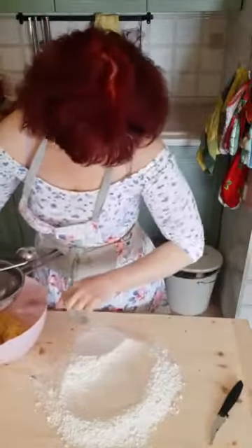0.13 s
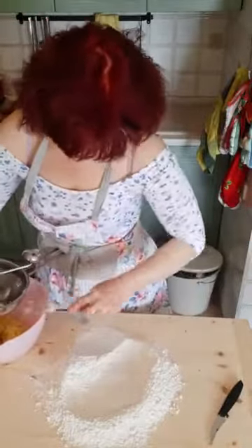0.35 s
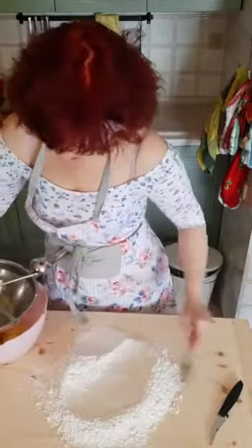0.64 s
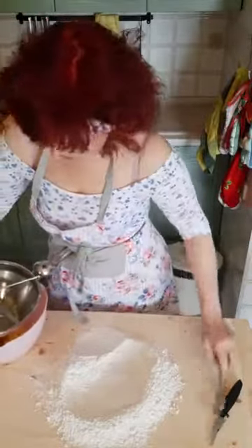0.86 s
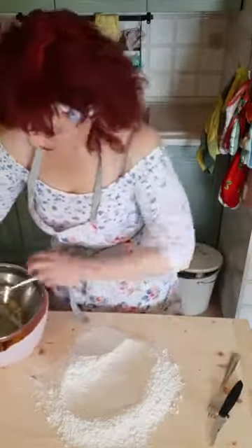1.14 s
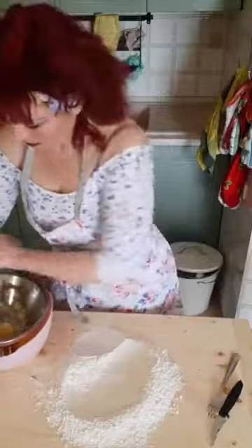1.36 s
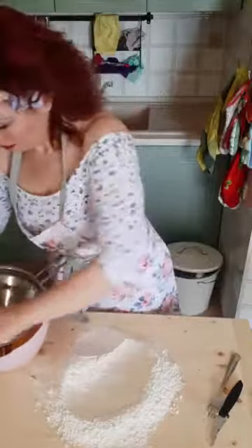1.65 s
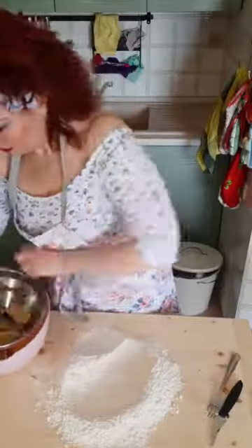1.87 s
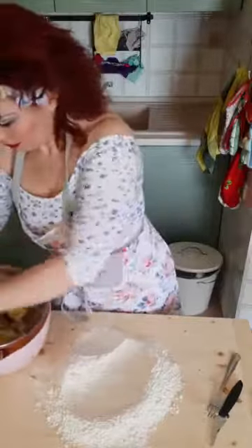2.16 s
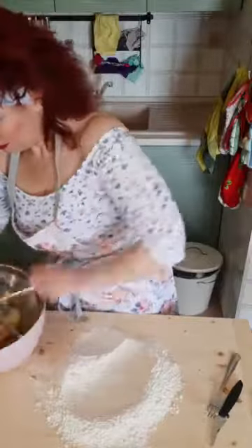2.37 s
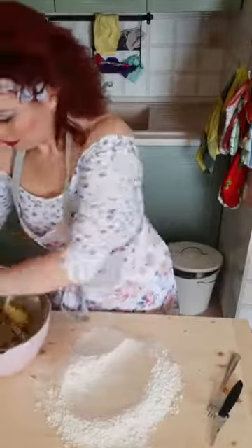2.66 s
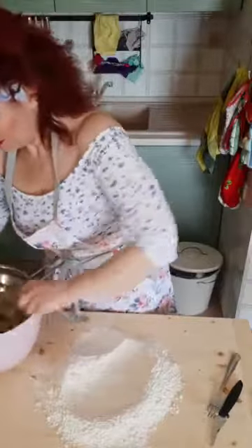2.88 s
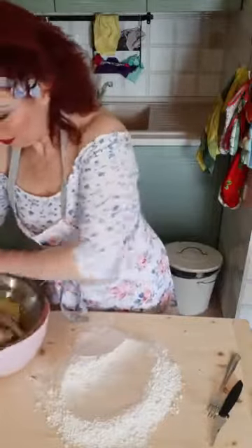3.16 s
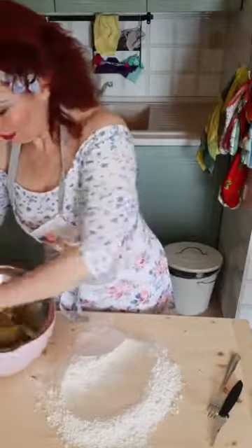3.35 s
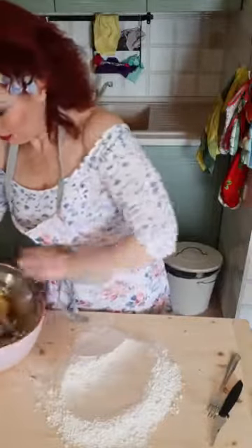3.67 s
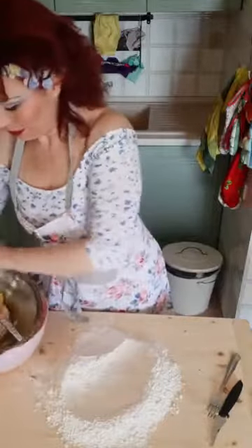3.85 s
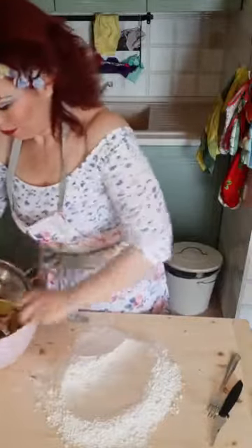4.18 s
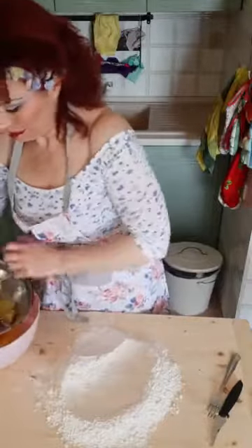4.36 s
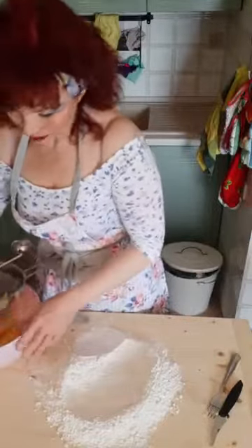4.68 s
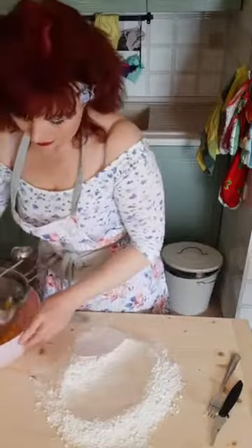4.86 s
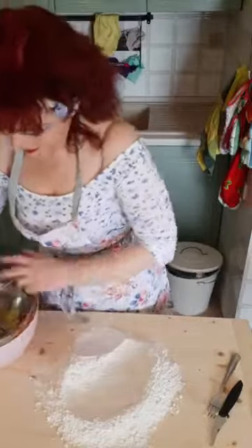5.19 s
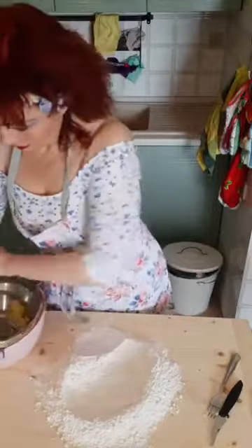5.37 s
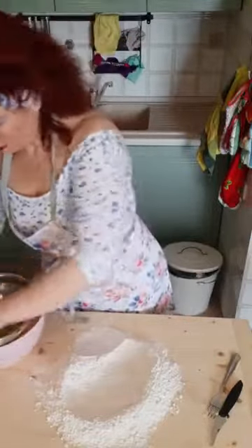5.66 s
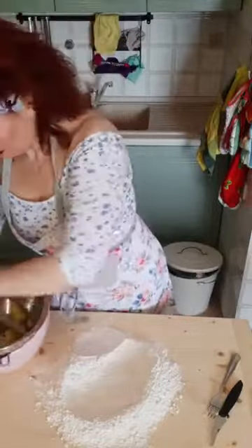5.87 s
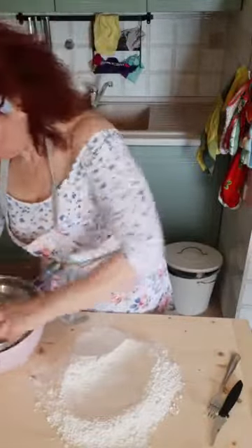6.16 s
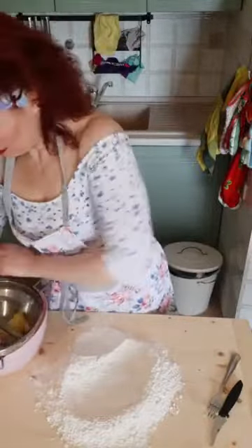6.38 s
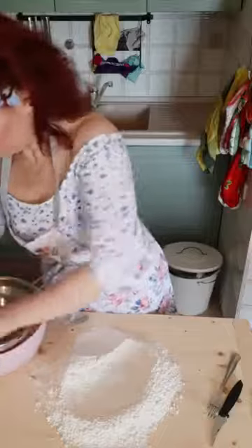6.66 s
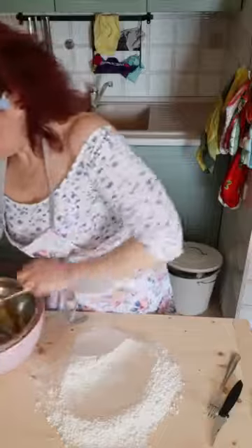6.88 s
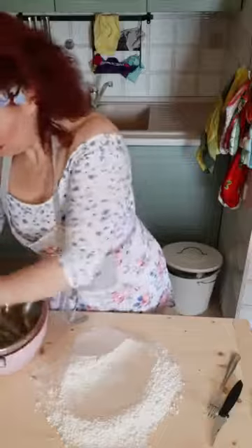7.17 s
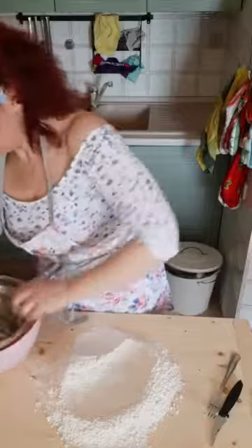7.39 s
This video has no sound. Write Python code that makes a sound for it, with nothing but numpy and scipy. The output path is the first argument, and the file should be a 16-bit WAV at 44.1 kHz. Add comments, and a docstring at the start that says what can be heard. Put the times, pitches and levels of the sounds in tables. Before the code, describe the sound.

A nearby stereo microphone hears a tiled kitchen with a lively half-second echo, faint hush and low table rumble. At 0.0, 0.15 and 0.3 seconds a fork taps a bowl, bright and ringing, the third strongest. A faint touch comes at 0.5; from 0.8 to 1.05 the fork clatters onto a wooden board, ending in the firmest contact. A clear bowl knock at 1.27 introduces a steel hand mill. From about 1.65 to 4.2 it grinds potato in uneven strokes, with gritty rasping, stick-slip clicks, ticks and small metal rattles, swelling around 2.2 and 4.0, with a solid knock at 3.6. A loud clank rings at 4.25, followed by brief scrapes and a lull. A heavier, blurred clank lands at 5.05. Grinding restarts near 5.3, growing fuller from 6.0 to 7.5, brighter and scrapier, with scattered knocks, the last at 7.5.

```python
"""A fork is tapped clean on a bowl and laid on a board; then a steel hand mill on the bowl is cranked,
its blade grinding potato over the perforated disc, with knocks and ticks, in a tiled kitchen.
Blows set sums of dying sine waves ringing; the crank rings bowl and steel with random stick-slip clicks
and adds gritty noise. Echoes, a low rumble in the table and a faint hush surround them."""
import sys
import numpy as np
from scipy import signal
from scipy.fft import rfft, irfft
from scipy.io import wavfile
from scipy.ndimage import uniform_filter1d

SR = 44100
rng = np.random.default_rng(int(sys.argv[2]) if len(sys.argv) > 2 else 0)


def wrap_up_sound(samples):
    """Save the sound to the file named by the first command line argument, as 16-bit audio."""
    columns = np.atleast_2d(samples).T
    # keep every value between -1 and 1, then stretch to whole-number steps
    tamed = np.clip(columns, -1, 1)
    steps = np.round(tamed * 32767).astype(np.int16)
    wavfile.write(sys.argv[1], SR, steps)


N = 332060

# How the bowl rings. Each row: pitch in Hz, width in Hz (wider dies sooner), relative level in dB.
BOWL_MODES = [(180, 110, -20), (286, 28, -7), (370, 27.6, -6.5), (437.5, 34.3, -4), (469.4, 13.7, -3.5),
              (508.4, 22.8, -1), (560, 107, -4.5), (623.4, 18.7, -8), (701, 42, -11), (718, 69, -10),
              (794, 19, -17), (821, 61, -14.5)]
# How the steel mill rings. Each row: pitch in Hz, width in Hz, relative level in dB.
STEEL_MODES = [(960, 64, 0), (1030, 160, 2), (1275, 950, -7), (1500, 91, -3.5), (1395, 220, -1.5),
               (1517, 104, -5), (1763, 320, -12.5), (1706, 41, -14.5), (2040, 190, 5.5), (2013, 193, 2.5),
               (2374, 240, -1.5), (2467, 190, 3), (2583, 200, 0.5), (2820, 170, -4), (3262, 160, -6),
               (3384, 260, -18.5), (3830, 1050, -0.5), (3810, 480, -16.5)]


def amp(db):
    """Turns decibels into a plain gain."""
    return 10 ** (np.asarray(db) / 20)


def evened(x):
    """Scales a signal to an rms of 1."""
    return x / np.sqrt(np.mean(x ** 2) + 1e-20)


def read(points, hz):
    """Reads a curve between its points, along a logarithmic pitch scale."""
    f, value = np.transpose(points)
    return np.interp(np.log(hz + 1), np.log(f + 1), value)


def add(mix, s, sound):
    """Adds a sound to the mix from second s on, cut off at the mix's end."""
    part = mix[round(s * SR):][:len(sound)]
    part += sound[:len(part)]


def colour(x, points):
    """Filters x by a spectrum given in dB, at unit mean power gain."""
    gain = amp(read(points, np.fft.rfftfreq(x.shape[-1], 1 / SR)))
    return irfft(rfft(x) * evened(gain), x.shape[-1])


def ring(modes, spot_hz, focus_db, held=0):
    """One blow's ringing, energy 1: uneven modes, weaker by focus_db per octave from the spot's pitch."""
    hz, width, db = np.transpose(modes)[:, :, None]
    t = np.arange(16000) / SR
    chance, detune = rng.standard_normal((2, len(modes), 1))
    db = db + 1.5 * chance - focus_db * abs(np.log2(hz / spot_hz))
    hz = hz * (1 + .004 * detune)
    width = width + held  # a hand on the body damps every mode
    sign = (-1) ** np.arange(len(modes))[:, None]  # neighbouring modes move in opposition
    strength = sign * amp(db) * np.sqrt(width)
    x = (strength * np.exp(-np.pi * width * t) * np.sin(2 * np.pi * hz * t)).sum(0)
    return x / np.linalg.norm(x)


def slips(per_s, spread_db):
    """Random stick-slip clicks of uneven size, rms 1."""
    when, size, sign = rng.random((3, N))
    size = np.maximum(size, .04)  # limits the biggest clicks
    clicks = (when < per_s / SR) * amp(-spread_db * np.log(size)) * np.sign(sign - .5)
    return evened(clicks)


def crank():
    """The blade slips over the holes: each slip rings bowl and steel, over a gritty rasp."""
    # Pushes on the crank. Each row: start in seconds, rise in seconds, hold in seconds, fall in seconds,
    # relative load on the bowl in dB, blade on disc in dB above the load, rasp in dB above the load,
    # steel pitch under the blade in Hz.
    strokes = [(1.32, .08, 0.46, .05, -63.5, -8, 1.5, 1900),
               (1.655, 0.019, 0.085, 0.16, -42, -2, -10.5, 1930),
               (1.85, 0.028, 0.022, 0.2, -43.5, -4, -10.5, 1850),
               (2.119, 0.16, 0.055, 0.33, -32.5, -5, -8.5, 1820), (2.609, 0.12, .2, 0.23, -36, 5, -6, 1800),
               (3.15, 0.035, 0.35, .07, -44, -14, -2, 1900),
               (3.61, 0.03, 0.15, 0.25, -44.5, -11, -0.5, 1835), (3.929, .22, .07, .05, -28, 5, -2, 1900),
               (4.35, 0.045, 0.031, 0.14, -37, 1, -21, 1750),
               (4.43, 0.03, 0.012, 0.026, -29, -0.5, -22, 1800),
               (5.29, 0.046, 0.011, 0.064, -42, 3.5, -16, 1300),
               (5.419, 0.097, 0.14, 0.024, -35, -9, -2, 2400),
               (5.54, 0.056, 0.091, 0.092, -31.5, -10, -25, 1800),
               (5.97, 0.015, 0.032, 0.024, -37.5, -10, -25, 1800),
               (6.03, 0.017, 0.12, 0.66, -36.5, 1.5, -8.5, 2160),
               (6.402, 0.24, 0.062, 0.75, -30.5, 2.5, -7.5, 2240),
               (7.09, 0.08, 0.13, 0.32, -36, -6, 1, 2350), (7.239, 0.022, 0.065, 0.2, -29, -6, -10.5, 2400)]
    # Noise of the rasping contact. Each row: pitch in Hz, relative level in dB per Hz.
    rasp_colour = [(410, -43), (700, 1.5), (830, -3.5), (1230, -11), (2020, -7.5), (3150, -7),
                   (4090, -15.5), (7650, -21), (9550, -27), (13800, -23), (15900, -30.5)]
    rows = np.array(strokes)
    pushes = np.array([push(*row[:4]) for row in rows])
    load_db, blade_db, rasp_db, under_hz = rows[:, 4:].T
    spots_hz = np.array([1330, 1800, 2640, 3380])
    # each push favours its own spot
    share = amp(-8 * abs(np.log2(under_hz / spots_hz[:, None])))
    share /= np.linalg.norm(share, axis=0)
    load = amp(load_db) @ pushes
    out = np.zeros(N)
    for spot_hz, here in zip(spots_hz, share):
        blade = (here * amp(load_db + blade_db)) @ pushes
        bowl_ring = ring(BOWL_MODES, 360, 1.9, held=15.5)
        out += 0.36 * signal.oaconvolve(load * slips(70, 3.8), bowl_ring)[:N]
        steel_ring = ring(STEEL_MODES, spot_hz, 6.5, held=15)
        out += .5 * signal.oaconvolve(blade * slips(per_s=70, spread_db=4.5), steel_ring)[:N]
    grains = uniform_filter1d(abs(slips(90, 3.2)), size=90)  # crumbs of about two milliseconds
    catches = uniform_filter1d(abs(slips(22, 2.7)), size=450)  # lumps dragged for ten milliseconds
    roughness = 0.25 + 0.41 * evened(grains) + 0.43 * evened(catches)
    grit = roughness * rng.standard_normal(N)
    rasp = amp(load_db + rasp_db) @ pushes * grit
    return out + amp(4.0) * colour(rasp, rasp_colour)


def push(start, rise, hold, fall):
    """One push's gain: the blade bites, the load swells, holds, eases, and the blade lets go."""
    touch_db, lift_db = -17, -18.5  # below full load at the push's start and end
    bite_db_per_s, let_go_db_per_s = 900, -400  # slopes before the start and after the end
    s = start + np.cumsum([0, rise, hold, fall])
    t = np.arange(0, N, 20) / SR  # one gain for every 20 samples
    db = np.interp(t, s, [touch_db, 0, 0, lift_db])
    db += bite_db_per_s * np.minimum(t - start, 0)
    db += let_go_db_per_s * np.maximum(t - s[-1], 0)
    return np.repeat(amp(db), 20)[:N]


def mill_knocks():
    """Knocks on bowl and mill set both ringing."""
    # Each row: start in seconds, relative bowl level in dB, relative steel level in dB,
    # relative tick level in dB, steel pitch favoured by the spot struck in Hz, contact in ms.
    knocks = [(0.522, -36, -35, -62, 1640, 8.3), (1.266, -7.5, -25.5, -35.5, 1080, 0.67),
              (1.652, -37, -45, -47, 2050, 2.8), (1.739, -40, -56, -41.5, 1280, 1.7),
              (1.863, -35, -39, -41, 1980, 4.5), (1.908, -31.5, -34.5, -56, 3100, 4.7),
              (2.124, -39, -46.5, -44.5, 2530, 5.3), (2.205, -37, -37.5, -44, 1520, 3.8),
              (2.296, -24, -34, -52, 1500, 1.9), (2.321, -41, -28, -30, 1610, 5.7),
              (2.427, -42, -33.5, -31.5, 3100, 4.5), (2.601, -48, -42, -40, 1810, 2.7),
              (2.633, -46, -42, -35.5, 2300, 4.8), (2.756, -31, -38, -39.5, 2268, 2.5),
              (2.97, -28, -51, -31, 1460, 3.5), (3.166, -34.5, -39.5, -36.5, 1260, 4.2),
              (3.251, -36, -26.5, -32.5, 2400, 1.52), (3.325, -36, -33, -46, 1050, 3.3),
              (3.478, -34, -35, -41, 1550, 4), (3.604, -13.5, -24.5, -28, 1700, 9.4),
              (3.758, -49, -32.5, -29.5, 1600, 3), (3.79, -44, -35, -41, 2500, 3),
              (3.828, -35, -37.5, -48, 2100, 4.3), (3.945, -29.5, -29, -32, 2730, 5.2),
              (4.08, -26, -26, -32, 1800, 1.9), (4.123, -29, -26, -30, 1990, 3.4),
              (4.179, -43, -23, -22, 1610, 4), (4.248, -5, -15.5, -29, 1180, 2.2),
              (4.353, -24.5, -29.5, -33, 2080, 3.2), (5.047, -6.5, -15.5, -20, 1480, 19),
              (5.431, -35.5, -39.5, -40.5, 3260, 4.9), (5.523, -39, -22.5, -23, 2900, 4.1),
              (6.035, -28, -31, -33.5, 2740, 9.8), (6.096, -23, -35, -30, 990, 4),
              (6.394, -25.5, -34, -41, 2680, 3.1), (6.503, -25, -41, -30, 2560, 2.9),
              (6.68, -21, -23, -21.5, 2860, 7.7), (7.102, -21.5, -31.5, -32, 2700, 3.9),
              (7.178, -25, -21.5, -22.5, 2400, 3.9), (7.502, -18, -27, -32.5, 1440, 5.3)]
    return blows(knocks, BOWL_MODES, STEEL_MODES)


def fork_taps():
    """The fork tapped on the rim rings the bowl below, the fork and rim above."""
    # Each row: start in seconds, relative bowl level in dB, relative rim level in dB,
    # relative tick level in dB, pitch favoured in Hz, contact in ms.
    taps = [(0.001, -5.5, -8, -16.5, 1440, 4.2), (0.156, -7, -11.5, -19, 1400, 5.1),
            (0.307, -2, -6.5, -14.5, 1600, 3.9)]
    # How fork and rim ring. Each row: pitch in Hz, width in Hz, relative level in dB.
    rim_modes = [(964, 40, -6.5), (1072, 58, -4), (1395, 79, -8.5), (1478, 25, -13), (1574, 48, -5),
                 (1754, 55, -6.5), (2050, 170, -10.5), (2266, 31, -6.5), (2547, 240, -6.5), (2880, 63, -6),
                 (3410, 800, -2.5), (4000, 240, -3)]
    return blows(taps, BOWL_MODES, rim_modes)


def fork_on_board():
    """The fork meeting the board knocks the wood and clatters, its own ringing damped."""
    # Each row: start in seconds, relative knock level in dB, relative clatter level in dB,
    # relative tick level in dB, pitch favoured in Hz, contact in ms.
    landings = [(0.773, -23, -32, -33, 1910, 6.6), (0.85, -24, -36.5, -58, 1860, 11),
                (0.918, -32, -36.5, -33, 1930, 3.4), (1.006, -27, -20, -23.5, 2170, 6),
                (1.042, -22, -11.5, -24, 2160, 16)]
    # How the board rings. Each row: pitch in Hz, width in Hz, relative level in dB.
    board_modes = [(260, 46, -4.5), (301, 22, -3.5), (465, 76, 0), (510, 120, -3.5), (770, 820, -10.5)]
    # How the fork rings on wood. Each row: pitch in Hz, width in Hz, relative level in dB.
    tine_modes = [(940, 270, 2), (1520, 140, -3.5), (1670, 186, 0), (1900, 790, -1), (2360, 410, -4.5),
                  (2520, 78, -9.5), (3020, 310, -6.5), (3470, 160, -6.5), (4100, 1500, -10)]
    return blows(landings, board_modes, tine_modes)


def blows(rows, low, high):
    """A first touch and a quick chatter shake a low and a high body and leave a bright tick."""
    # Colour of a tick. Each row: pitch in Hz, relative level in dB per Hz.
    tick_colour = [(1500, -29), (3000, -6.5), (4800, -1), (6500, -9.5), (9000, -18.5), (13000, -21),
                   (16200, -34.5)]
    out, ticks, t = np.zeros(N), np.zeros(N), np.arange(2000) / SR
    for s, low_db, high_db, tick_db, spot_hz, ms in rows:
        # the chatter fades to about a third within the contact time
        chatter = np.exp(-1000 * t / max(ms, .2)) * rng.standard_normal(len(t))
        chatter /= np.linalg.norm(chatter)
        contact = .4 * chatter
        contact[0] = 1  # the first touch
        # a blow's energy lies above its heard level, since the room spreads it over a long tail
        body = amp(low_db + 20) * ring(low, 540, 3.8)
        body += amp(high_db + 25.0) * ring(high, spot_hz, 9.6)
        add(out, s, signal.fftconvolve(body, contact))
        add(ticks, s, amp(tick_db + 23.5) * (0.38 * contact + 0.57 * chatter))
    return out + colour(ticks, tick_colour)


def kitchen(x):
    """Direct sound, a little later on the left, then the tiled walls' tail, blended from three tails in a
    steady 0.8 Hz cycle."""
    # How long the echoes last. Each row: pitch in Hz, time to die by 60 dB in seconds.
    decays = [(100, 0.12), (260, 0.43), (700, 0.59), (1840, 0.54), (4850, 0.53), (12800, 0.41)]
    # Straight path against the tail. Each row: pitch in Hz, level in dB.
    straight = [(100, -8), (500, -1.5), (1500, -5.5), (4000, -1), (10000, -4)]
    # The left port faces away. Each row: pitch in Hz, change on its straight path in dB.
    shadow = [(800, -1.5), (2500, -4.5), (6000, -7.5), (15000, -13.5)]
    t = np.arange(round(.9 * SR)) / SR
    turn = 2 * np.pi * .8 * np.arange(N) / SR  # the tail shifts in a steady 0.8 Hz cycle
    hz = np.fft.rfftfreq(N, 1 / SR)
    late = np.exp(-2j * np.pi * hz * 5 / SR)  # a delay of 5 samples
    sides = np.array([late * amp(read(shadow, hz)), 1 + 0 * hz])
    out = irfft(rfft(x) * amp(read(straight, hz)) * sides, N)
    # near surfaces answer first and strongest
    build = np.clip((t - .002) / 0.0029, 0, 1) * (1 + 0.57 * np.exp(-t / 0.0083))
    for k in range(3):
        tail = diffuse(.9, decays) * build
        tail /= np.linalg.norm(tail[0])
        share = np.sqrt(2 / 3) * np.cos(turn + k * np.pi / 3)  # squares sum to 1
        out += amp(-2.0) * signal.fftconvolve((share * x)[None], tail, axes=1)[:, :N]
    return out


def diffuse(seconds, decays):
    """Two-channel noise, alike in the bass and unrelated in the treble, dying band by band."""
    # Each row: pitch in Hz, likeness of left and right from 0 to 1.
    likeness = [(60, .97), (380, .93), (700, .7), (1300, 0), (15000, 0)]
    hz = np.fft.rfftfreq(512, 1 / SR)
    t = np.arange(round(seconds * SR) // 128 + 5) * 128 / SR
    a, b, c, d = rng.standard_normal((len(t), len(hz), 4)).T
    same = np.clip(read(likeness, hz), -1, 1)[:, None]
    left, other = a + 1j * b, c + 1j * d
    z = np.array([left, same * left + np.sqrt(1 - same ** 2) * other])
    z = z * amp(-60 * t / read(decays, hz)[:, None])
    return signal.istft(z, nperseg=512, noverlap=384)[1][:, :round(seconds * SR)]


def steady_noise():
    """Diffuse noise for the whole scene, its decay too slow to hear."""
    return diffuse(N / SR, [(10, 1e5), (20000, 1e5)])


def table(sources):
    """Low rumble: the table top takes up the energy of all that rests on it and lets it die away."""
    # How strongly fork taps, fork on board, knocks and cranking, in this order, reach the table, in dB.
    coupling_db = [-26.5, -21, -23, -23]
    # Low bumps in the table. Each row: start in seconds, level in dB.
    thumps = [(0.42, -55), (0.52, -61), (4.05, -50), (4.46, -44.5), (7.11, -45)]
    # Colour of the rumble. Each row: pitch in Hz, relative level in dB per Hz.
    thud_colour = [(20, -30), (38, 8.5), (60, -9.5), (120, 3), (160, -1), (220, -2), (300, -48)]
    settle_s, still_db = 0.63, -79  # time to die by 60 dB, and the resting level
    power = amp(coupling_db) ** 2 @ sources ** 2
    keep = 1e-6 ** (1 / (settle_s * SR))  # share of the energy left after one sample
    for s, db in thumps:
        add(power, s, np.array([amp(db) ** 2 / (1 - keep)]))
    stored = signal.lfilter([1 - keep], [1, -keep], power)
    level = np.sqrt(stored + amp(still_db) ** 2)
    return level * evened(colour(steady_noise(), thud_colour))


def hush():
    """The faint, steady background: coloured noise at one level."""
    # Each row: pitch in Hz, relative level in dB per Hz.
    hush_colour = [(15, -32.5), (25, 11.5), (134, 5), (217, -21.5), (285, -9.5), (1520, 6), (2690, -12),
                   (4740, -2), (7710, -17), (16000, -16.5)]
    return amp(-64.5) * evened(colour(steady_noise(), hush_colour))


def scene():
    """All sources heard in the kitchen, with the table's rumble and the hush."""
    sources = np.array([fork_taps(), fork_on_board(), mill_knocks(), crank()])
    return kitchen(sources.sum(0)) + table(sources) + hush()


def record(dry):
    """The microphone drops the bass, its two ports differ in the treble; then the band limit."""
    # Each row: pitch in Hz, left minus right in dB.
    ports = [(60, -1.5), (130, 0), (290, -1), (640, 0.5), (1410, -1), (3100, 2), (6820, -5), (15000, -10.5)]
    hz = np.fft.rfftfreq(N, 1 / SR)
    tilt_db = read(ports, hz) / 2
    bass_cut = hz ** 4 / (hz ** 4 + 39.4 ** 4)
    heard = irfft(rfft(dry) * amp([tilt_db, -tilt_db]) * bass_cut, N)
    edge_hz = 16050
    low_pass = signal.firwin(511, edge_hz, window=("kaiser", 9), fs=SR)
    return signal.oaconvolve(heard, low_pass[None], "same")


dry = scene()
out = record(dry)
wrap_up_sound(out)
```